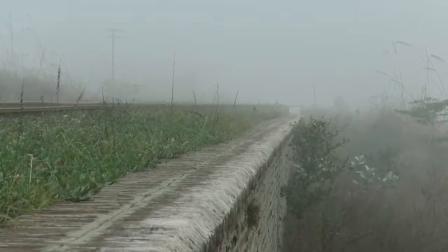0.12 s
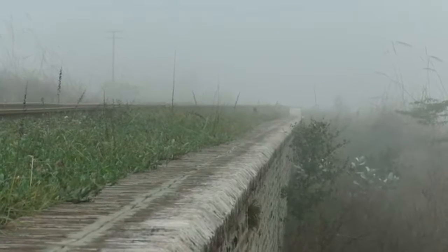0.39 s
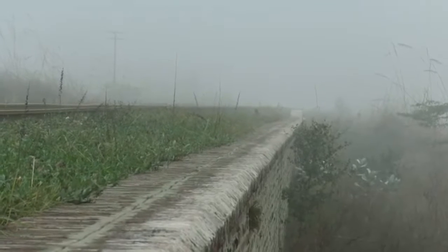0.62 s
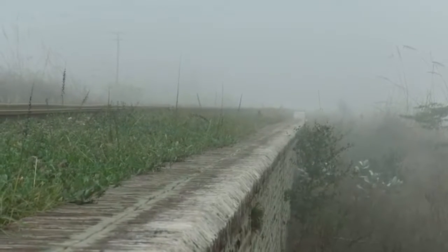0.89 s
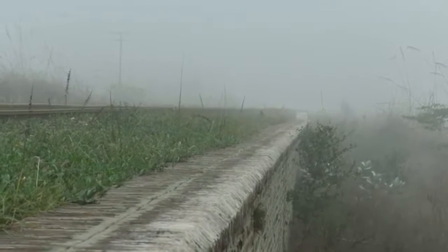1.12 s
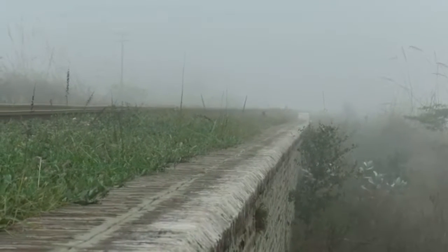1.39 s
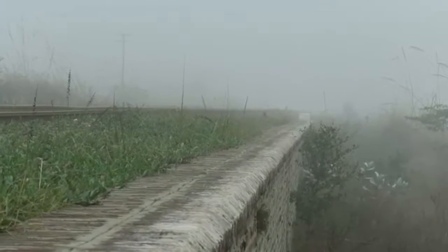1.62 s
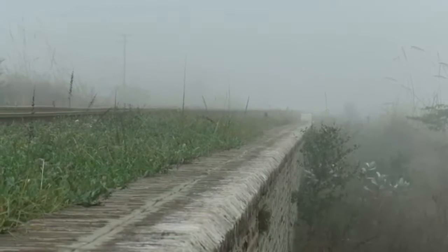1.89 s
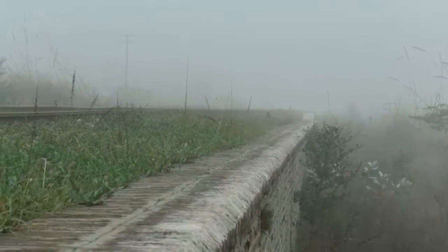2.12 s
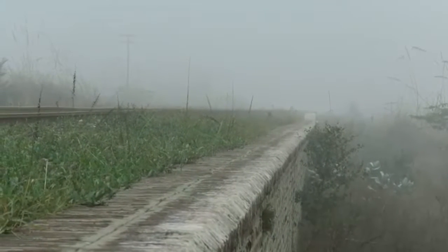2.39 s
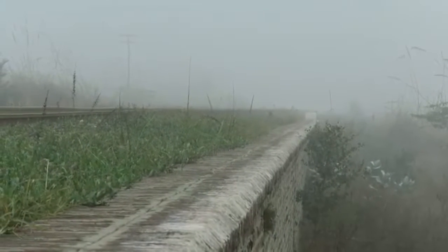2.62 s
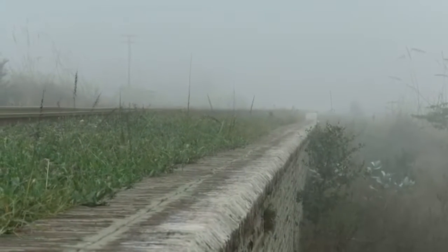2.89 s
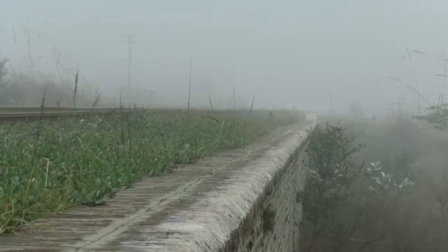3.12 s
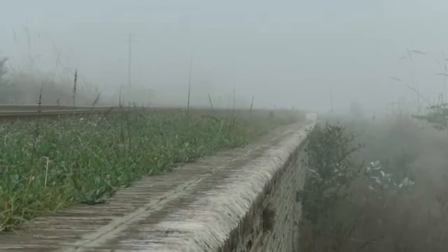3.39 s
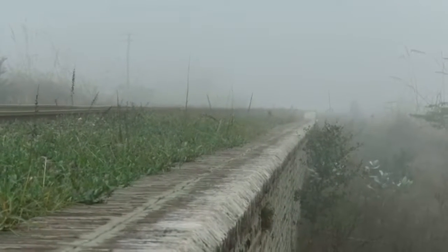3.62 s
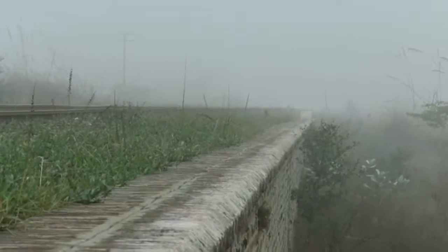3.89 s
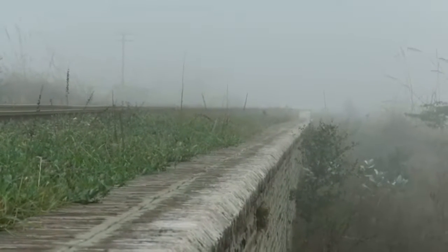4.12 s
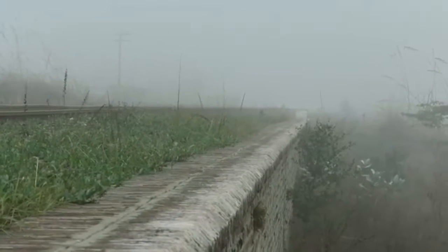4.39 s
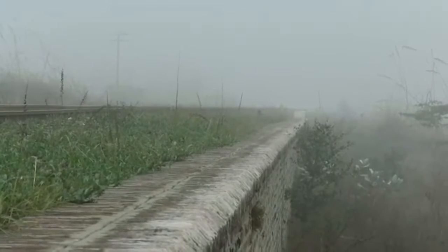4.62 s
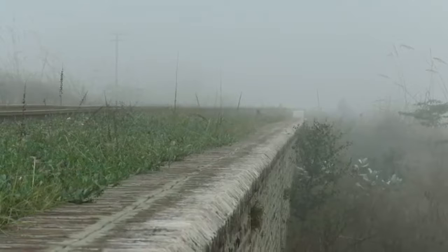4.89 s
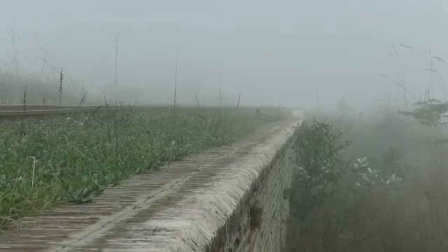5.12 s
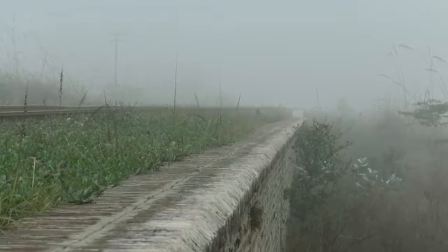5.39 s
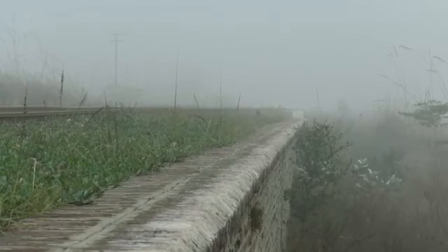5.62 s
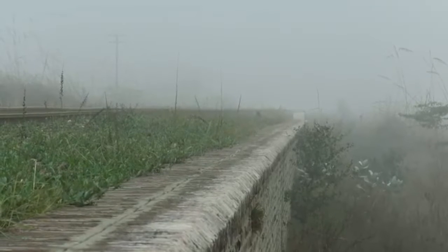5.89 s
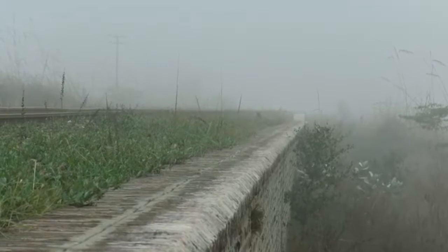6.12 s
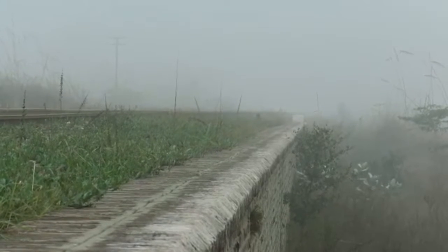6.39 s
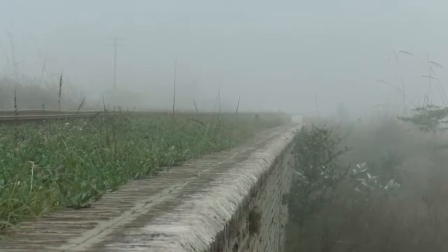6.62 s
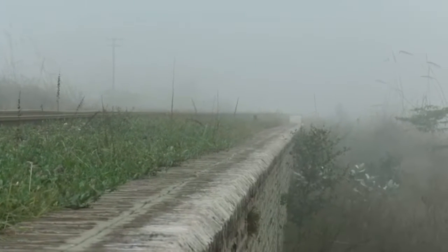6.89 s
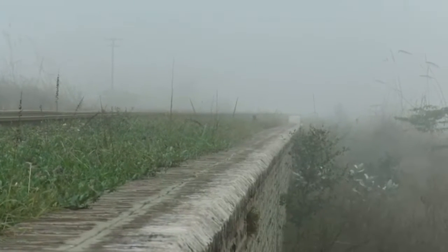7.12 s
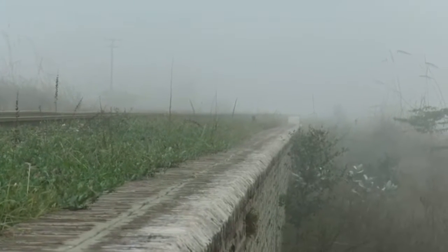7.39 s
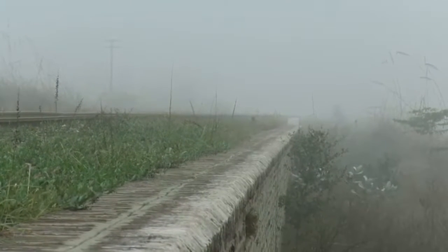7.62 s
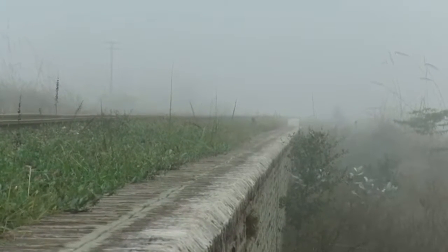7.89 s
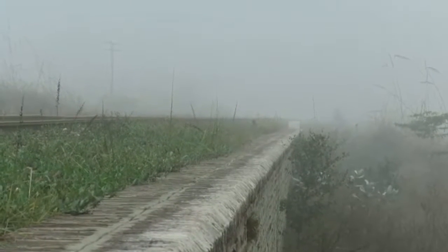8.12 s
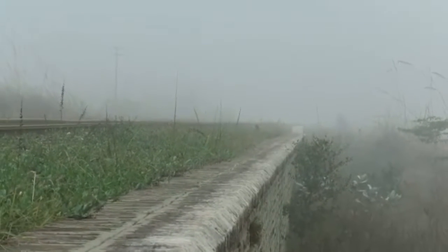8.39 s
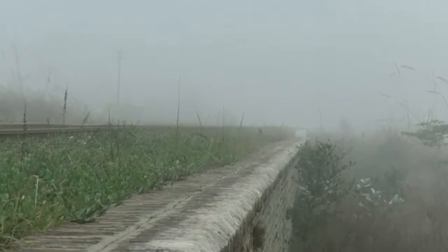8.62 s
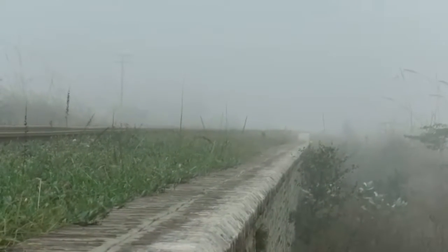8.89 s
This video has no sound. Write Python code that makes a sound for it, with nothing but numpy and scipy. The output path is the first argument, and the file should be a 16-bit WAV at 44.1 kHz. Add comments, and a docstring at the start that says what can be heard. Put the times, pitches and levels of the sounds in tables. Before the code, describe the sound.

A foggy, open embankment with a steady distant murmur of air and traffic. Small birds tick and chirp quietly, mostly early on, with faint far crows. A nearby high crow caws twice, then strong low wind buffets a stereo microphone. Later a lower, rougher crow caws, the high one joins, and a last high caw closes. Birds sit near centre; the wind rumbles widely.

```python
"""Over a steady distant outdoor murmur of air and traffic (shaped noise), on a foggy embankment, gusts buffet two
microphone ports mostly in opposite phase: noise and short eddies, strongest from about 3.3 s on.
Far crows answer from the start, and small birds slur, tick and peep in gliding near-sine notes.
A high crow caws nearby from 2.4 s and a lower one from 6.2 s: harmonics and breath through throat and beak.
Dry stems snap from 6.1 s (short pulses), a low faint whistle follows at 6.45 s (near-sine notes),
and dry grass hisses near 7.75 s (narrow noise)."""
import sys
import numpy as np
from scipy import signal
from scipy.fft import rfft, irfft
from scipy.io import wavfile
from scipy.ndimage import uniform_filter1d

SR = 44100
rng = np.random.default_rng(int(sys.argv[2]) if len(sys.argv) > 2 else 0)


def undo_db(level):
    """Turn decibels back into plain size, where 20 dB means ten times bigger."""
    steps = np.asarray(level, float) / 20
    return 10 ** steps


def bounce(signal):
    """Save signal as a 16-bit WAV file at the path given by the first command-line argument."""
    frames = np.transpose(np.atleast_2d(signal))
    limited = np.clip(frames, -1, 1)
    pcm = np.round(limited * 32767).astype(np.int16)
    wavfile.write(sys.argv[1], SR, pcm)


N = 396900
T = np.arange(N) / SR

# throat resonances shared by the low crow and the far crows, before the neck shifts them: (place_hz, gain_db)
LOW_THROAT = [(450, -49), (900, -12), (1340, -9.5), (1800, -0.5), (2050, -8.5), (2350, -36), (3390, -40),
              (3800, -27), (4300, -36.5), (7230, -50.5), (13000, -63.5)]
# how each of their caws unfolds: (share_of_length, throb_depth_share_of_pitch, level_swing_0_to_1,
# pitch_factor, beak_resonance_hz)
LOW_COURSE = [(0, .03, .6, 1, 4600), (.2, .065, .35, 1, 5200), (.4, .075, .25, 1, 5800),
              (.9, .08, .2, 1, 4600), (1, .05, .2, .93, 4400)]
# note shape shared by peeps and low whistle: (time_after_start_s, base_pitch_hz, relative_level_db)
SOFT_SHAPE = [(0, 2590, -1), (.02, 2447, 17), (.05, 2400, 6), (.065, 2380, -21)]
# peeps and low whistle, told apart by pitch: (start_s, base_level_db, pitch_factor)
SOFT_NOTES = [(.41, -79, .9), (.455, -83, .98), (0.549, -77, 1.04), (.95, -80, 0.71), (3.785, -72, .93),
              (3.91, -74, 0.97), (5.06, -81, 0.9), (6.09, -81, 1.22), (6.15, -75, 1.4), (6.45, -74, 0.58),
              (6.5, -71, .5), (6.61, -83, 1.4), (7.29, -81, 1.1), (7.345, -82, 1.2), (7.44, -77, 0.95),
              (7.5, -81, 0.94)]
PEEP_NOTES = [note for note in SOFT_NOTES if note[2] > 0.6]
WHISTLE_NOTES = [note for note in SOFT_NOTES if note[2] <= 0.6]


def evened(x):
    """Scales a sound to an rms level of 1."""
    return x / np.sqrt(np.mean(x ** 2) + 1e-20)


def read(points, hz):
    """Reads a spectrum between its points, on a log-frequency axis."""
    f, value = np.transpose(points)
    return np.interp(np.log(hz + 1), np.log(f + 1), value)


def add(mix, start_s, sound):
    """Mixes a sound in from the given second."""
    part = mix[max(round(start_s * SR), 0):][:len(sound)]
    part += sound[:len(part)]


def coloured(points, size):
    """Spectrum of a noise with the given colour, and its frequencies."""
    hz = np.fft.rfftfreq(size, 1 / SR)
    return rfft(rng.standard_normal(size)) * undo_db(read(points, hz)), hz


def wander(top_hz, size):
    """Smooth random movement, mostly slower than top_hz."""
    hz = np.fft.rfftfreq(size, 1 / SR)
    return evened(irfft(rfft(rng.standard_normal(size)) * np.exp(-(hz / top_hz) ** 2), size))


def air():
    """Steady distant murmur: noise with faint patches, partly alike on the two sides."""
    # colour of the murmur: (frequency_hz, relative_level_db_per_hz)
    air_colour = [(12, -52), (20, -14), (81, -1), (129, -3.5), (235, -16.5), (308, -9.5), (533, -15),
                  (740, -14.5), (1120, -21), (3430, -33.5), (8930, -44.5), (11100, -49), (13800, -56.5)]
    # how alike left and right are: (frequency_hz, likeness_minus_1_to_1)
    side_likeness = [(60, 0.44), (200, -0.63), (600, 0.064), (13000, -0.29)]
    frames, hz = N // 512 + 5, np.fft.rfftfreq(2048, 1 / SR)
    a, b, c, d, patches = rng.standard_normal((frames, 1025, 5)).T
    patches = evened(uniform_filter1d(uniform_filter1d(patches, 24, 0), 8, 1))
    same = np.clip(read(side_likeness, hz), -1, 1)[:, None]
    left, other = a + 1j * b, c + 1j * d
    right = same * left + np.sqrt(1 - same ** 2) * other
    spectrum = np.array([left, right]) * undo_db(read(air_colour, hz)[:, None] + 1.3 * patches)
    murmur = signal.istft(spectrum, nperseg=2048, noverlap=1536)[1][:, :N]
    return undo_db(-46) * evened(murmur)


def turbulence(points, strength_db, lumps_db, reach):
    """Wind noise in octave bands; the higher the band, the more it follows gusts and lumps."""
    spectrum, hz = coloured(points, N)
    spectrum /= np.sqrt(np.mean(irfft(spectrum, N) ** 2))
    octave = np.clip(np.log2(hz / 40 + 1e-9), 0, 4)
    out = np.zeros(N)
    for b in range(5):
        band = irfft(spectrum * np.cos(np.pi / 2 * np.clip(octave - b, -1, 1)) ** 2, N)
        swell_db = strength_db * (1 + reach * (b - 1)) + lumps_db * (1 + 0.33 * (b - 1))
        out += band * undo_db(swell_db)
    return out


def chance_eddies(gust_db):
    """Chance eddies sized by the gust; quicker ones have a sharper front."""
    slot_s, eddies_per_s = 0.02, 7
    slots = np.arange(.05, N / SR - .05, slot_s)
    slots = slots[rng.random(len(slots)) < eddies_per_s * slot_s]
    size, speed = rng.standard_normal((2, len(slots)))
    level_db = gust_db[(slots * SR).astype(int)] + 2 + 2.5 * np.tanh(size)
    octaves = 0.33 * speed
    front_db = -14 + 18 * octaves  # 18 dB per octave of speed
    return np.transpose([slots, level_db, 177 * 2 ** octaves, front_db])


def wind():
    """Lumpy turbulence and single eddies push the ports mostly oppositely, the upper part more on the right."""
    # course of the gusts: (time_s, wind_strength_db)
    gusts = [(0, -40), (.2, -56.5), (.55, -44.5), (.75, -51.5), (1.0, -42.5), (1.3, -62), (1.42, -42),
             (1.52, -30.5), (1.9, -30.5), (2.1, -31.5), (2.6, -31.5), (3.24, -32.5), (3.33, -23.5),
             (3.42, -17), (3.7, -25.5), (3.95, -20), (4.2, -24), (4.5, -29), (4.62, -25), (4.8, -28),
             (5.1, -25), (5.25, -25), (5.35, -32.5), (5.48, -31.5), (5.65, -23), (5.85, -31.5), (6.05, -24),
             (6.3, -18), (6.5, -22.5), (6.6, -34.5), (6.75, -23.5), (7.0, -21), (7.25, -36.5), (7.5, -48),
             (7.62, -25.5), (7.9, -24), (8.3, -31), (8.55, -30.5), (8.7, -38.5), (8.85, -34), (9, -34)]
    # eddies that stand out from the wind around them:
    # (centre_s, body_db, pitch_hz, sharp_front_relative_to_body_db)
    buffets = [(1.53, -17, 207, -17), (1.605, -18.9, 230, -8), (1.647, -22.5, 222, -16),
               (1.864, -17, 190, -15), (1.985, -19, 171, -14), (2.098, -21, 176, -21),
               (2.191, -24, 172, -22), (2.253, -20, 209, -13), (2.443, -14.5, 172, -9),
               (2.51, -18.0, 218, -10), (2.688, -19.5, 183, -19), (2.923, -23, 207, -20),
               (2.969, -16, 169, -19), (3.072, -17.5, 206, -7), (3.335, -13, 190, -4),
               (3.366, -10.5, 201, -22), (3.404, -21, 209, -3), (3.449, -6, 189, -18),
               (3.475, -11, 238, -9), (3.535, -13, 198, -12), (3.554, -18, 208, -6), (3.589, -6, 183, -17),
               (3.665, -13.5, 167, -21), (3.763, -14.0, 245, -7.5), (3.895, -14, 265, -5),
               (3.922, -9.5, 211, -10), (3.971, -22, 318, -3), (4.001, -18, 221, -3), (4.077, -22, 261, -8),
               (4.128, -12, 190, -13), (4.229, -15, 176, -22), (4.255, -18, 297, -5),
               (4.293, -17.5, 199, -3), (4.322, -17, 190, -6), (4.462, -16, 203, -15),
               (4.57, -11.1, 175, -17), (4.639, -11.5, 190, -9), (4.808, -10, 190, -24),
               (4.948, -7, 162, -14), (5.082, -15.5, 202, -18), (5.169, -5.5, 157, -22),
               (5.238, -9.5, 244, -3.5), (5.608, -13.0, 204, -13), (5.645, -13.4, 242, -5),
               (5.672, -21, 237, -1), (5.771, -10.5, 143, -14), (5.898, -13, 160, -31),
               (5.95, -13, 178, -18), (6.064, -9, 305, -7), (6.103, -18, 272, -7), (6.175, -20, 217, -9),
               (6.2, -14, 183, -17), (6.24, -12.5, 222, -14), (6.278, -11.5, 270, -5),
               (6.305, -22, 258, -9), (6.333, -14.5, 256.7, -7), (6.36, -19, 267, -1),
               (6.384, -15.5, 157, -14), (6.466, -12.1, 205, -9.5), (6.538, -16, 197, -12),
               (6.739, -12, 209, -11), (6.944, -12.5, 263, -6), (6.999, -15, 220, -9),
               (7.04, -12.4, 193, -15), (7.244, -22.5, 187, -16), (7.684, -18.5, 182.6, -11),
               (7.842, -13.5, 237, -9), (7.917, -9.5, 227, -8.5), (8.026, -12, 225, -6.5),
               (8.171, -16, 192, -15), (8.318, -18.5, 212, -8), (8.424, -19.5, 175, -20),
               (8.804, -27, 168, -19), (8.886, -22, 244, -10)]
    # wind pushing one port in and the other out: (frequency_hz, relative_level_db_per_hz)
    opposed_colour = [(12, -70), (20, -40.5), (43, -22), (102, 3.5), (169, 2), (315, -4.5), (624, -40),
                      (818, -45), (900, -52.5), (1170, -72), (1980, -120)]
    # wind pushing both ports alike: (frequency_hz, relative_level_db_per_hz)
    shared_colour = [(12, -67), (20, -28), (64, -0.5), (123, 3), (174, -3), (281, -12), (381, -19.5),
                     (585, -34.5), (900, -46), (1170, -64.5), (1980, -120)]
    usual_db = -25
    gust_db = np.interp(T, *np.transpose(gusts))
    strength_db = gust_db - usual_db
    lumps, own = (1.4 * np.tanh(wander(25, N) / 1.2) for _ in range(2))  # bounded in size
    opposed = turbulence(opposed_colour, strength_db, 5.5 * lumps, reach=0.26) * undo_db(usual_db - 3.0)
    shared = turbulence(shared_colour, 0.66 * strength_db, 1.77 * lumps + 3.63 * own, reach=0.37)
    shared *= undo_db(usual_db - 9.5)

    t = np.arange(-1200, 1200) / SR
    for s, db, hz, front_db in np.vstack([chance_eddies(gust_db), buffets]):
        phase = rng.random(3)
        fade = np.exp(-(hz * t / 1.03) ** 2)
        body, shared_body = (np.cos(2 * np.pi * (hz * t + p)) * fade for p in phase[:2])
        front = undo_db(front_db) * np.cos(2 * np.pi * (420 * t + phase[2])) * np.exp(-(t / 0.0022) ** 2)
        add(opposed, s + t[0], undo_db(db) * (body + front))
        add(shared, s + t[0], undo_db(db - 12.5) * shared_body)

    upper = signal.lfilter(*signal.butter(1, 110, "high", fs=SR), opposed)
    lean = 0.31 * upper - 0.098 * opposed  # makes the two sides unequal
    return shared - lean + opposed * [[1], [-1]]


def voiced(throbs_per_s, upper_db, drive, voice):
    """Lays a crow's voicing over the breath of one caw; overtones swell with the effort."""
    s, db, hz = np.transpose(drive)
    share, *columns = np.transpose(voice)
    t = np.linspace(s[0], s[-1], 60)
    db, hz = np.interp(t, s, db), np.interp(t, s, hz)
    throb_factor, *timbre = (np.interp(np.linspace(0, 1, len(t)), share, c) for c in columns)
    overtones_db = upper_db + 0.5 * np.maximum(db - db.max(), -8)  # 0.5 dB for each dB of effort
    return np.transpose([t, db, hz, throbs_per_s * throb_factor, *timbre, overtones_db])


def caw(rows, throat, course, beak_db, usual_hz, spit_db, jitter=0.29):
    """Harmonics and breath pass throat and beak; a fast throb shakes pitch and level, giving sidebands and rasp."""
    s, *columns = np.transpose(rows)
    t = np.arange(s[0], s[-1], 1 / SR)
    effort_db, hz, throbs, odd_db, breath_db, tilt_db, upper_db = (np.interp(t, s, c) for c in columns)
    share, *columns = np.transpose(course)
    progress = (t - s[0]) / max(s[-1] - s[0], .28)
    depth, swing, bend, beak_hz = (np.interp(progress, share, c) for c in columns)
    stretch = (hz / usual_hz) ** 0.26  # the neck shortens as the pitch rises

    def colour(f, at):
        """Gain of throat and two beak resonances at frequency f and sample at."""
        beak = sum(size / (1 + ((f - place * beak_hz[at]) / 380) ** 2)
                   for place, size in ((0.98, 1.0), (0.91, 0.43)))
        tube = undo_db(read(throat, f / stretch[at])) + undo_db(beak_db) * beak
        slope_db = tilt_db[at] * np.log2(np.clip(f, 900, 2700) / 1600)
        return tube * undo_db(slope_db + upper_db[at] * np.clip((f - 2600) / 600, 0, 1))

    throb = 2 * np.pi * (np.cumsum(throbs * (1 + 0.051 * wander(25, len(t)))) / SR + rng.random())
    hz = hz * bend * (1 + depth * np.sin(throb) + (jitter * depth + 0.0052) * wander(300, len(t)))
    turn = 2 * np.pi * np.cumsum(hz) / SR
    k = np.arange(1, 24)[:, None]  # harmonic numbers
    level = colour(k * hz, slice(None))
    level = level * undo_db(odd_db * (k % 2) - 1.9 * (k * hz > 5600))  # the top of the voice is mostly air
    loud = uniform_filter1d((level ** 2).sum(0) / 2, 1200) ** .5
    swells = 1 + swing * np.cos(throb - 0.72 * k)  # harmonics swell in turn
    voice = (level * swells * np.cos(k * turn + k ** 2)).sum(0) / loud

    f, at, z = signal.stft(rng.standard_normal(len(t)), SR, nperseg=256, noverlap=192)
    f, at = f[:, None], np.minimum(at * SR, len(t) - 1).astype(int)
    z = z * undo_db(6.6 * np.clip((f - 4400) / 600, 0, 1)) * colour(f, at)
    breath = signal.istft(z, nperseg=256, noverlap=192)[1][:len(t)]
    breath = evened(breath) * (1 + 0.33 * np.cos(throb))

    # bright air as the beak opens
    spit = signal.lfilter(*signal.butter(2, [6000, 9500], "band", fs=SR), rng.standard_normal(len(t)))
    spit = spit * undo_db(spit_db) * np.exp(-((t - s[0] - .022) / 0.022) ** 2)
    sound = undo_db(effort_db) * (voice + undo_db(breath_db) * breath + spit)
    return s[0], sound * signal.windows.tukey(len(t), .04)


def far_crows():
    """Far caws sink in pitch while their level swells and falls, and arrive breathy."""
    # (start_s, length_s, base_level_db, base_pitch_hz)
    far_caws = [(0.03, 0.3, -85, 340), (1.519, 0.22, -59.5, 441), (2.187, 0.18, -56.5, 524),
                (2.708, 0.26, -63, 428), (3.874, 0.26, -62.5, 485), (4.18, 0.22, -58.5, 441),
                (5.243, 0.17, -64, 428), (7.132, 0.23, -55, 404), (8.373, 0.24, -62.5, 474)]
    # course of every caw: (share_of_length, effort_db, pitch_factor)
    far_course = [(0, -4.5, 0.99), (.15, -3, 0.99), (.6, -1.5, .98), (1, -6, .91)]
    # voicing: (share_of_length, throb_factor, odd_harmonics_db, breath_db, tilt_db_per_octave)
    far_voice = [(0, 1, 0, -6, 3), (1, 1, 1, -7.5, 3)]
    out = np.zeros(N)
    for s, length, db, hz in far_caws:
        drive = [(s + share * length, db + effort_db, hz * bend) for share, effort_db, bend in far_course]
        rows = voiced(72, -5, drive, far_voice)
        add(out, *caw(rows, LOW_THROAT, LOW_COURSE, beak_db=-50, usual_hz=450, spit_db=-51, jitter=0.15))
    return out


def gliding_notes(shape, notes, waver):
    """Near-sine notes, each a gliding template slightly wavering and moved in pitch."""
    out = np.zeros(N)
    at, hz, db = np.transpose(shape)
    t = np.arange(0, at[-1], 1 / SR)
    for s, note_db, factor in notes:
        pitch_hz = np.interp(t, at, hz) * factor * (1 + waver * wander(250, len(t)))
        tone = np.sin(2 * np.pi * np.cumsum(pitch_hz) / SR)
        level = undo_db(note_db + np.interp(t, at, db))
        add(out, s, level * tone * signal.windows.tukey(len(t), .2))
    return out


def songbirds():
    """Small birds slur, tick and peep in gliding near-sine notes."""
    # note shapes: (time_after_start_s, base_pitch_hz, relative_level_db)
    slur_shape = [(0, 3400, -2), (.012, 3530, 0.5), (.026, 3510, 1), (.055, 3040, 3), (.088, 2680, -2.5),
                  (.112, 2490, -17)]
    tick_shape = [(0, 4460, -5), (.006, 3775, 1), (.013, 3300, 2.5), (.022, 2620, -11)]
    # notes sung: (start_s, base_level_db, pitch_factor)
    slur_notes = [(.228, -67, 0.89), (0.831, -61.5, 1.02), (1.203, -59, .99), (1.691, -61.5, 0.96),
                  (2.226, -57.5, 0.98), (2.85, -59.5, 0.99), (3.47, -61.5, 0.96), (3.75, -70, .98),
                  (4.565, -60.5, 0.99), (5.79, -60.5, 0.96), (7.11, -63.5, 1)]
    tick_notes = [(0.383, -56, 1.01), (.555, -55.5, 1), (.668, -62, 0.94), (0.785, -55.5, 0.94),
                  (0.902, -57.5, 1), (1.063, -56, 0.96), (2.952, -60, 1.03), (5.69, -62, 0.98),
                  (5.945, -59.5, 0.93)]
    slurs = gliding_notes(slur_shape, slur_notes, waver=.005)
    ticks = gliding_notes(tick_shape, tick_notes, waver=.035)
    peeps = gliding_notes(SOFT_SHAPE, PEEP_NOTES, waver=.01)
    return slurs + ticks + peeps


def high_crow():
    """The higher near crow, with a strong beak resonance and a spit of bright air."""
    # caws: (base_throbs_per_s, overtones_above_throat_db, breath rows of (time_s, effort_db, base_pitch_hz))
    high_caws = [ (84, 3, [(2.365, -70, 557), (2.373, -45.5, 567), (2.421, -38.5, 594), (2.479, -39.5, 601),
                 (2.561, -43, 578.5), (2.605, -44, 538), (2.653, -42, 574), (2.665, -62, 569)]),
                 (80.5, 2, [(3.23, -61, 584), (3.252, -45.5, 570), (3.342, -40.5, 608.4), (3.42, -45, 592),
                 (3.47, -48.5, 532), (3.494, -48.5, 521), (3.536, -47.5, 570), (3.55, -62, 580)]),
                 (71.4, 4, [(6.848, -48, 602.3), (6.882, -43, 591.4), (6.942, -39.5, 623),
                 (6.98, -41.5, 629.4), (7.0, -44, 601), (7.09, -45, 547), (7.125, -43.5, 565),
                 (7.14, -45, 540)]), (71.1, -3.5, [(8.795, -70, 581), (8.807, -54, 572.5),
                 (8.873, -43.5, 588), (8.953, -45.5, 606), (9.01, -48, 559), (9.085, -48, 550)])]
    # throat resonances before the neck shifts them: (place_hz, gain_db)
    high_throat = [(600, -46), (1200, -1), (1800, -3), (2400, -4), (3000, -20), (3650, -27.5),
                   (4120, -11.5), (4550, -30.5), (8000, -34.5), (9800, -34.5), (12500, -45.5), (13500, -71)]
    # how each caw unfolds: (share_of_length, throb_depth_share_of_pitch, level_swing_0_to_1,
    # pitch_factor, beak_resonance_hz)
    high_course = [(0, .01, .1, 1, 4600), (.1, .007, .15, 1, 5100), (.25, .014, .35, 1, 6700),
                   (.5, .032, .6, 1, 6900), (.85, .045, .6, 1, 6400), (.9, .02, .2, 1, 6000),
                   (.93, .01, .1, .94, 5800), (.97, .01, .1, .7, 5500), (1, .01, .1, .64, 5400)]
    # voicing: (share_of_length, throb_factor, odd_harmonics_db, breath_db, tilt_db_per_octave)
    high_voice = [(0, 0.99, -10, -6, 4), (.05, 1, -23, -2.5, 2.5), (.2, 1.018, 0.5, -16, 2.5),
                  (0.371, 1, 3, -11.5, -1.5), (.62, .93, 2.5, -1.5, -2.5), (.8, .9, -1, -4.5, 1),
                  (.9, .92, -9, -3, -3.5), (1, 0.82, -12, -11, -7.5)]
    out = np.zeros(N)
    for row in high_caws:
        rows = voiced(*row, high_voice)
        add(out, *caw(rows, high_throat, high_course, beak_db=-25.5, usual_hz=638, spit_db=-10))
    return out


def stem_snaps():
    """Dry stems snap: very short, thin, bright pulses."""
    # (start_s, level_db)
    snaps = [(6.13, -41), (6.266, -54)]
    out = np.zeros(N)
    t = np.arange(-40, 40) / SR
    for s, db in snaps:
        add(out, s, undo_db(db) * np.cos(2 * np.pi * 10200 * t) * np.exp(-(t / 0.00014) ** 2))
    return out


def low_crow():
    """The lower near crow, with its own voicing and throat and a weak beak resonance."""
    # caws: (base_throbs_per_s, overtones_above_throat_db, breath rows of (time_s, effort_db, base_pitch_hz))
    low_caws = [ (70.4, -1.5, [(6.16, -72, 390), (6.176, -44, 408), (6.214, -37, 446), (6.28, -34, 465),
                (6.37, -35.5, 428), (6.394, -38.5, 396), (6.44, -59.5, 430)]), (75, 5, [(6.72, -64, 413),
                (6.746, -46, 417), (6.798, -40, 450), (6.876, -38, 454), (6.902, -45, 424),
                (6.954, -42, 425), (6.99, -50, 440)])]
    # voicing: (share_of_length, throb_factor, odd_harmonics_db, breath_db, tilt_db_per_octave)
    low_voice = [(0, 1, -6.5, -4, 3), (.22, 1.01, -0.5, -6, 3), (.48, 1, -2, -14.5, 1.9),
                 (.75, .94, -9, -20, 5.6), (1, .9, 1, -15, 4)]
    out = np.zeros(N)
    for row in low_caws:
        rows = voiced(*row, low_voice)
        add(out, *caw(rows, LOW_THROAT, LOW_COURSE, beak_db=-55, usual_hz=441, spit_db=-30, jitter=0.11))
    return out


def low_whistle():
    """Low faint whistle, perhaps a far crow: two gliding near-sine notes."""
    return gliding_notes(SOFT_SHAPE, WHISTLE_NOTES, waver=.01)


def grass_hiss():
    """Dry grass hisses once, in a narrow band of noise that swells and fades."""
    band = [(3300, -37), (3900, -3), (4300, 0), (4700, -9.5), (5300, -43)]  # (frequency_hz, relative_level_db)
    hiss = evened(irfft(coloured(band, N)[0], N))
    after = T - 7.75
    level = undo_db(-66 - 40 * abs(after))  # 40 dB per second down on either side
    rise = 1 / (1 + np.exp(-after / .04))
    return hiss * level * rise * (after < .33)


def field(x):
    """Sparse echoes from bank and brush, different on each side, dying 60 dB in 0.19 s."""
    t = np.arange(SR // 2) / SR
    sparse = rng.random((2, len(t))) < .05
    taps = rng.standard_normal((2, len(t))) * sparse * undo_db(-60 * t / 0.19) * (t > .003)
    taps = signal.lfilter([1], [1, -.6], taps)  # dulls the echoes
    return signal.fftconvolve(x[None], taps / np.linalg.norm(taps[0]), axes=1)[:, :N]


def scene():
    """Birds and grass slightly right of centre, the small notes more echoing; wind and air around them."""
    murmur, gusting = air(), wind()
    crows_and_grass = far_crows() + high_crow() + stem_snaps() + low_crow() + grass_hiss()
    small = songbirds() + low_whistle()
    direct = (crows_and_grass + small) * undo_db([[-.4], [.4]])  # left, right
    echoes = field(undo_db(-17.0) * crows_and_grass + undo_db(-11.0) * small)
    return direct + echoes + gusting + murmur


def top_cut(x):
    """Nothing passes above the cut-off."""
    return signal.sosfilt(signal.butter(12, 13980, fs=SR, output="sos"), x)


def record(dry):
    """Passes the finished mix on to its last stage."""
    return top_cut(dry)


dry = scene()
out = record(dry)
bounce(out)
```